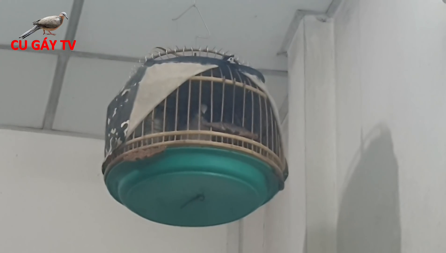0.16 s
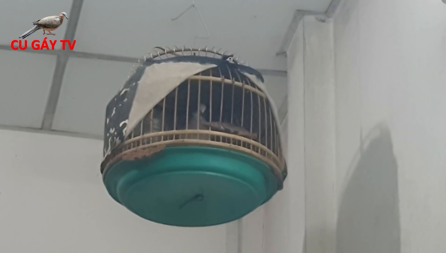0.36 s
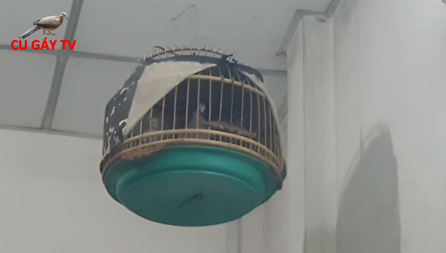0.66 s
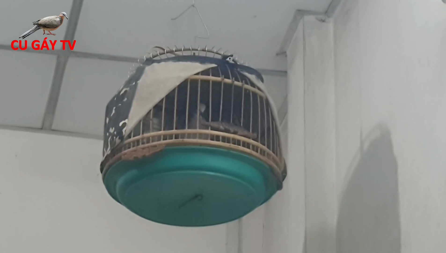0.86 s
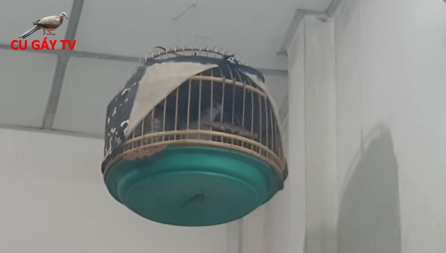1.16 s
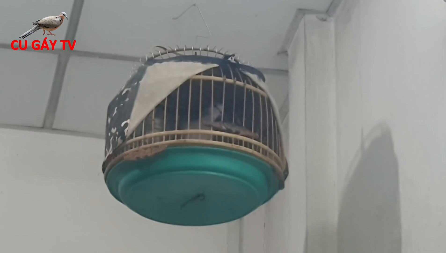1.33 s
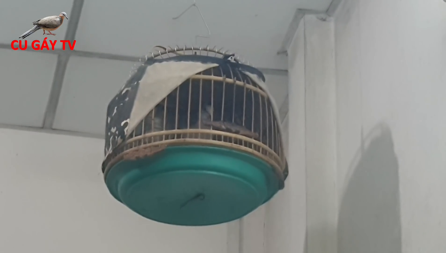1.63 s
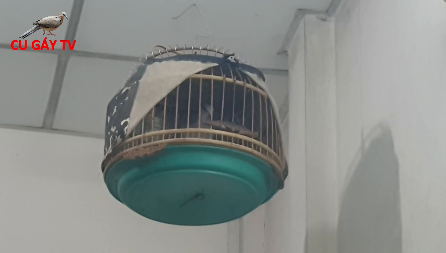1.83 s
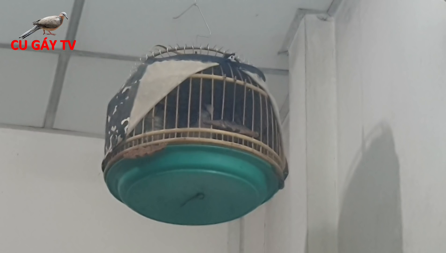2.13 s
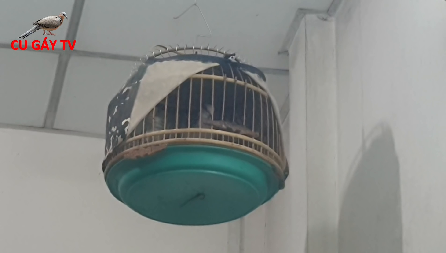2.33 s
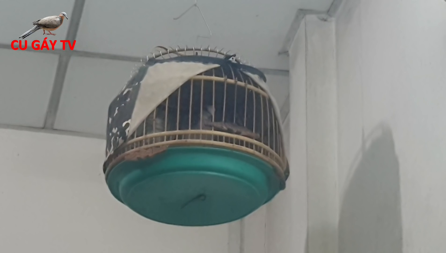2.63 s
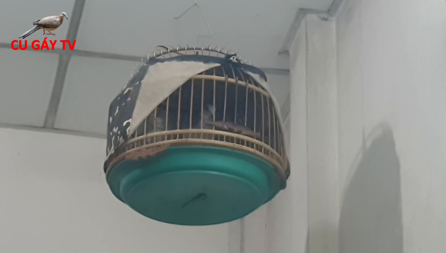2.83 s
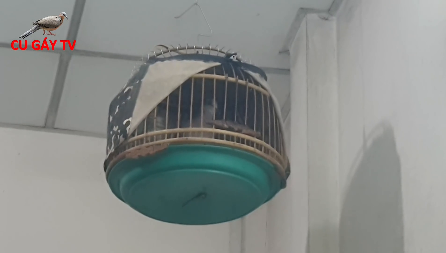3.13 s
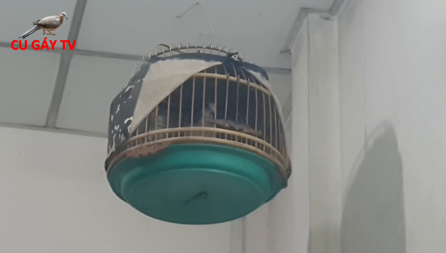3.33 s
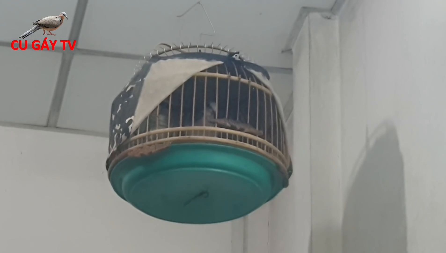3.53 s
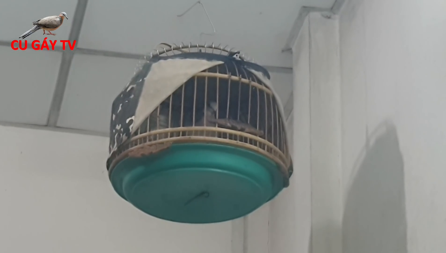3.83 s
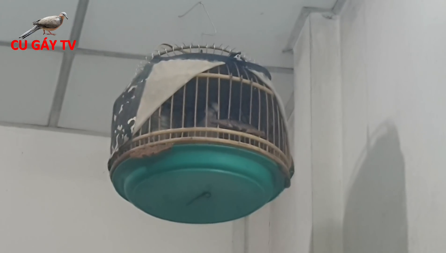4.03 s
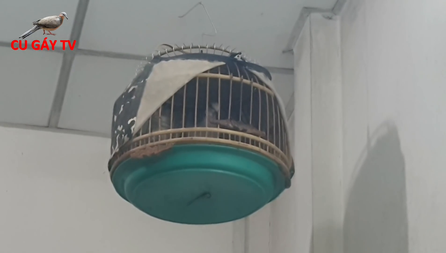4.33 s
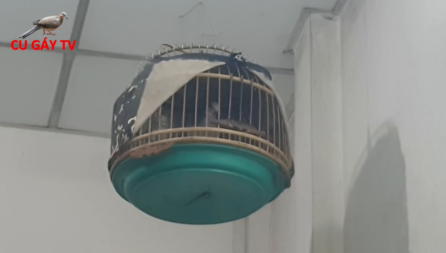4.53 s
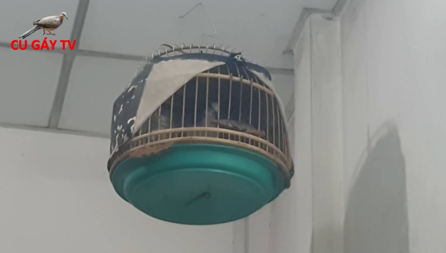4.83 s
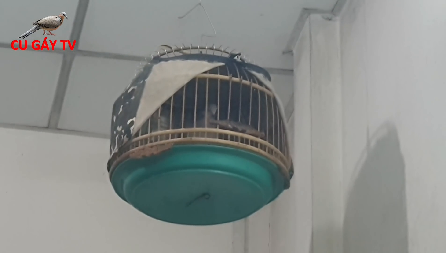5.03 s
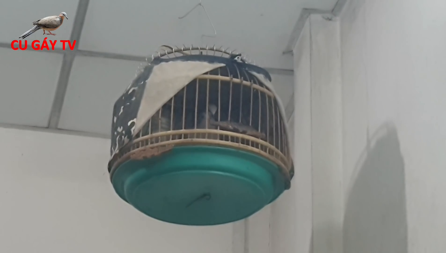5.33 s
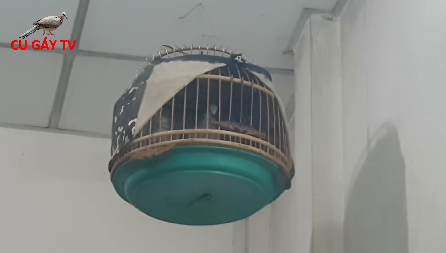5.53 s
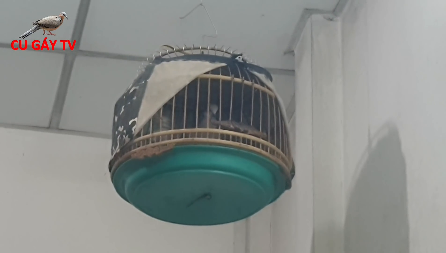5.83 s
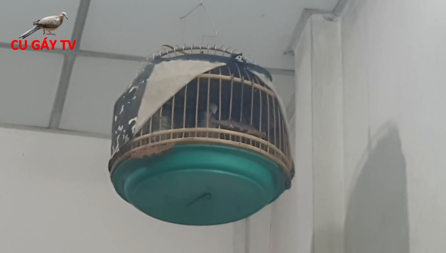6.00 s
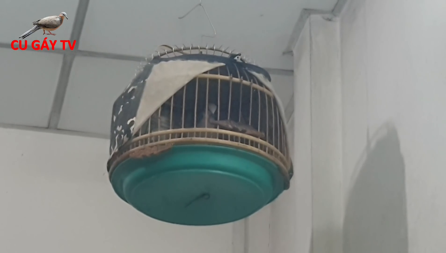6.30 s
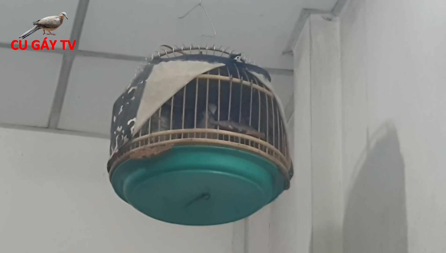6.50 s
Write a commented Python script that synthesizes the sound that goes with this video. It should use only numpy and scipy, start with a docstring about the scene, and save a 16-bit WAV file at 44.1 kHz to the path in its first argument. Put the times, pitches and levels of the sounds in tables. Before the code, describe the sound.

A caged dove coos nearby in a bare, echoing room. It gives four phrases, each one or two short notes followed by a longer, trilled coo that rings off the walls. A farther dove answers softly midway and again over the last coo. Faint feather rustles and thin cheeps of small birds come and go above a steady low room rumble.

```python
"""A spotted dove in a hanging cage starts cooing at once, over the steady low rumble of a bare room.
Each phrase is one or two short arched notes, then a long trilled coo, voiced through its swollen throat.
Feathers rustle and small birds cheep faintly, early on and now and then after. The dove calls again
at 1.5 s, a farther dove answers at 2.7 s, and two more phrases follow at 3.3 s and 5.2 s.
The far dove joins in over the last coo. The hard walls smear every note and ring on after it."""
import sys
import numpy as np
from scipy import signal
from scipy.fft import rfft, irfft, next_fast_len
from scipy.io import wavfile
from scipy.ndimage import uniform_filter1d, map_coordinates

SR = 44100
rng = np.random.default_rng(int(sys.argv[2]) if len(sys.argv) > 2 else 0)


def bounce(signal):
    """Save signal as a 16-bit WAV file at the path given by the first command-line argument."""
    frames = np.transpose(np.atleast_2d(signal))
    limited = np.clip(frames, -1, 1)
    pcm = np.round(limited * 32767).astype(np.int16)
    wavfile.write(sys.argv[1], SR, pcm)


N = 293706
TIME = np.arange(N) / SR

# tone colour of the low rumble: frequency_hz, relative_db
RUMBLE_COLOUR = [(18, -44), (30, -19), (47, -2.5), (62, -6), (82, -12), (99, -7), (130, -8), (175, -1),
                 (245, -2), (330, -6.5), (400, -10.5), (500, -25.5), (700, -56), (1100, -120)]
# tone colour of the soft air noise: frequency_hz, relative_db
AIR_COLOUR = [(240, -28.5), (430, -3.5), (600, -1), (1000, -6.5), (1400, -12), (1850, -13.5), (2400, -18),
              (3100, -26.5), (3900, -30.5), (4800, -28), (7700, -34.5), (8600, -34), (9100, -38.5),
              (11000, -42.5)]
# resonances of a distant motor: pitch_hz, width_hz, level_db
MOTOR_BANDS = [(178.1, 14, -63), (1201, 17, -65)]
# how alike the noise is left and right (1 = the same): frequency_hz, likeness
STEREO_LIKENESS = [(40, .9), (200, 1), (330, 0.95), (600, .4), (1100, 0), (3000, 0), (11000, 0)]
# how much louder the left side is: frequency_hz, left_minus_right_db
STEREO_BALANCE = [(50, 3), (170, 3), (320, -0.9), (700, 1), (1500, 4), (3200, 4.5), (4500, 0.5),
                  (6000, -1.5), (7500, 8), (9000, 7.5), (11000, 3)]
# time the echo takes to fade by 60 dB: frequency_hz, fade_s
ECHO_TIMES = [(200, 1), (700, 0.75), (3500, 0.24), (10000, 0.64)]
# standing waves between the walls: pitch_hz, level_db, left_minus_right_db
ROOM_TONES = [(567, -4.5, 1.5), (530, 2.5, -4.5), (560, -2, -7), (594.3, 5, 4), (651, 1.5, -3.5),
              (684.8, -4.5, -2.5), (689, -3.5, 1), (697, -2, -5), (750, -9.5, -3), (784, -1, 6.5),
              (797, -12.5, 1), (839, -1, 0.5), (857, -4.5, 0.5), (864, 0.5, 4.5)]
# swells of thin, high bird chatter: start_s, length_s, level_db
TWITTER_SWELLS = [(0.32, 0.52, -71), (1.45, 0.72, -72.5), (2.035, 0.57, -69), (3.492, 1, -72.5),
                  (5.445, 0.56, -69.5)]
# tone colour of that chatter: frequency_hz, relative_db
TWITTER_COLOUR = [(3500, -27.5), (4400, -2), (4900, -0.5), (5400, -7.5), (6100, -4), (7200, -18.5)]
# cheeps of small birds: start_s, pitch_hz, length_s, level_db, rasp (0 to 1)
BIRD_CHEEPS = [(.372, 3590, 0.16, -71, 0.85), (2.335, 3580, 0.16, -72, 0.94),
               (2.37, 5830, 0.095, -75, 0.55), (2.908, 3990, 0.14, -74.5, 0.8),
               (2.93, 5900, 0.039, -79, .6), (3.80, 5950, 0.19, -80, 0.9), (4.19, 3490, 0.13, -74, 1),
               (5.52, 4320, 0.09, -75, .7), (5.68, 6050, .2, -79, 0.6), (5.85, 4540, 0.053, -73, 0.8),
               (5.89, 5470, 0.053, -78, .5), (6.285, 3650, 0.17, -74, 0.24)]
# feather strokes: start_s, level_db, fade_s (time to fall 20 dB)
FEATHER_STROKES = [(0.108, -57.5, 0.082), (0.293, -61, 0.069), (0.364, -56.5, 0.067), (0.524, -62, 0.065),
                   (0.716, -52.5, 0.071), (0.83, -61, 0.069), (1.61, -61.5, 0.06), (2.314, -56.5, 0.067),
                   (2.58, -61, 0.063), (4.176, -60, 0.086), (5.252, -61, 0.08), (5.42, -55.5, 0.1),
                   (6.063, -62, 0.096), (6.3827, -64.5, 0.18), (6.515, -64, 0.08)]
# tone colour of a feather stroke: frequency_hz, relative_db
FEATHER_COLOUR = [(1500, -16), (2700, 3.5), (3600, -3.5), (5000, 2.5), (7500, -4.5), (10500, -4),
                  (12000, -21)]
# hoarse noise around a dove's tone: frequency_hz, relative_db
HOARSE_COLOUR = [(300, -27), (430, -8), (530, -3), (700, -1.5), (850, -4.5), (1000, -9.5), (1200, -26.5),
                 (2000, -26), (2800, -34), (4000, -51.5)]
# short arched notes that open each phrase: start_s, length_s, top_pitch_hz, level_db
OPENING_NOTES = [(-.01, 0.18, 713.2, -38.5), (1.529, 0.093, 718.6, -35), (1.703, 0.18, 712.3, -37),
                 (3.277, 0.081, 683, -34.5), (3.471, .14, 693, -35), (5.159, 0.086, 794.5, -31.5),
                 (5.324, 0.16, 691, -34.5)]
# the near dove's long coos:
# start_s, length_s, top_pitch_hz, level_db, crest_after_s, sink_hz_per_s, push_after_s, push_db
NEAR_COOS = [(0.323, 0.39, 823, -26.5, 0.082, 487.7, 0.301, 5.5),
             (2.037, 0.39, 829.3, -25.5, 0.098, 530.4, 0.2, 1.5),
             (3.778, .397, 835.4, -25, .105, 579.7, .207, 5),
             (5.651, 0.39, 825, -24.5, .11, 535.6, 0.23, 5)]
# the farther dove's coos, with the same columns
ANSWER_COOS = [(2.73, 0.44, 893, -52.5, .23, 842, 0.4, 7), (5.94, .55, 768, -40, .11, 501.6, 0.44, 9.8)]


def amp(db):
    """Turn decibels into a number to multiply by."""
    return 10 ** (np.asarray(db) / 20)


def unit(x):
    """Scale a sound to an average strength (rms) of 1."""
    return x / np.sqrt(np.mean(x ** 2) + 1e-20)


def look_up(points, hz):
    """Read between the rows of a (frequency_hz, value) table, on a log frequency scale."""
    frequencies, values = np.transpose(points)
    return np.interp(np.log(hz + 1), np.log(frequencies + 1), values)


def wobble(rate):
    """A smooth curve through `rate` random values a second."""
    return map_coordinates(rng.standard_normal(int(N * rate / SR) + 4), [TIME * rate])


def phase(hz):
    """The angle a wave has turned through as its pitch moves."""
    return 2 * np.pi * np.cumsum(hz) / SR


def gate(age, length, edge_s):
    """Fade a note in and out at its edges."""
    return np.clip(np.minimum(age, length - age) / edge_s, 0, 1)


def filtered(x, response):
    """Shape a sound: response(f) scales and delays each frequency."""
    size = next_fast_len(N + SR)
    return irfft(rfft(x, size) * response(np.fft.rfftfreq(size, 1 / SR)), size)[..., :N]


def resonance(f, hz, width):
    """Response of something that rings at one pitch, 1 at its centre."""
    return 1j * f * width / (hz * hz - f * f + 1j * f * width)


def placed(pair):
    """Give left and right a different tone colour."""
    return filtered(pair, lambda f: amp(np.outer([.5, -.5], look_up(STEREO_BALANCE, f))))


def stereo_noise(colour):
    """Noise whose two sides are alike in the bass and unrelated in the treble."""
    def response(f):
        angle = np.arccos(np.clip(look_up(STEREO_LIKENESS, f), -1, 1)) / 2
        return amp(look_up(colour, f)) * [np.ones_like(f), np.tan(angle)]
    shared, opposed = filtered(rng.standard_normal((2, N)), response)
    return np.array([shared + opposed, shared - opposed]) / np.std(shared)


def background(rumble_db=-50, air_db=-55):
    """Low rumble, soft air noise and a distant motor's hum."""
    rumble = amp(rumble_db + 0.47 * wobble(5)) * stereo_noise(RUMBLE_COLOUR)
    air = amp(air_db + 0.13 * wobble(4.2)) * stereo_noise(AIR_COLOUR)
    hum = 0
    for hz, width, db in MOTOR_BANDS:
        noise = stereo_noise([(100, 0), (2000, 0.0034)])
        hum += amp(db) * unit(filtered(noise, lambda f: resonance(f, hz, width) ** 2))
    return placed(rumble + air + hum)


def room(x, direct_db, echo_db, width_db=0):
    """The direct sound plus a smeared echo, partly shared by left and right and partly opposed."""
    hz, t, noise = signal.stft(rng.standard_normal((2, SR)), SR, nperseg=256)
    fade = amp(-60 * t / look_up(ECHO_TIMES, hz)[:, None])
    spectrum = rfft(signal.istft(noise * fade, SR, nperseg=256)[1])
    # the walls return the same energy in every band
    energy = np.abs(uniform_filter1d(np.abs(spectrum) ** 2, size=40))
    tail = irfft(spectrum / np.sqrt(energy + 1e-12))[:, :SR // 2]
    shared, opposed = signal.fftconvolve(x[None], tail, axes=1)[:, :N] / np.sqrt(2)
    return amp(direct_db) * x + amp(echo_db) * (shared + np.outer([1, -1], amp(width_db) * opposed))


def standing_waves(f, width_hz=5.1):
    """The room's ringing tones; close ones beat, so a note swells again after it ends."""
    sides = np.array([[.5], [-.5]])
    return sum(amp(db + lean * sides) * resonance(f, hz, width_hz) for hz, db, lean in ROOM_TONES)


def twitter():
    """Far-off chatter blurs into soft, high swells."""
    swells = np.zeros(N)
    for start, length, db in TWITTER_SWELLS:
        progress = np.clip((TIME - start) / length, 0, 1)
        swells += amp(db) * np.sqrt(np.abs(np.sin(np.pi * progress)))
    chatter = unit(amp(1.6 * wobble(25)) * stereo_noise(TWITTER_COLOUR))
    return placed(swells * chatter) * amp(-2.5)


def small_birds(drop=.008, snap=0.33, settle_s=.003, rasp_depth=0.032, fade_db=12):
    """Each cheep snaps down to a raspy, nearly level pitch and fades."""
    cheeps = np.zeros(N)
    waver = rasp_depth * wobble(300)
    for start, hz, length, db, rasp in BIRD_CHEEPS:
        age = np.clip(TIME - start, 0, length)
        past_middle = age / length - .5
        pitch = hz * (1 + rasp * waver + snap * np.exp(-age / settle_s) - drop * past_middle)
        cheeps += amp(db - fade_db * past_middle) * gate(age, length, .004) * np.sin(phase(pitch))
    return placed(room(cheeps, direct_db=-7, echo_db=3))


def feathers(rise_s=0.011):
    """Feathers brush the cage bars in brief, grainy strokes."""
    strokes = np.zeros(N)
    for start, db, fade_s in FEATHER_STROKES:
        age = np.maximum(TIME - start, 0)
        strokes += amp(db) * (1 - np.exp(-age / rise_s)) * amp(-20 * age / fade_s)
    grains = rng.standard_normal(N) * amp(4.5 * wobble(400))
    rustle = unit(filtered(grains, lambda f: amp(look_up(FEATHER_COLOUR, f))))
    return placed(room(strokes * rustle, direct_db=-8, echo_db=0.5))


def throat(tone, octave_db=-48, cutoff_hz=870, hoarse_db=-19):
    """The swollen throat pouch passes the main tone, a little hoarseness and a trace of the octave."""
    wave = signal.hilbert(tone, next_fast_len(N))[:N]  # its size follows the tone's loudness
    octave = np.real(wave * wave) / (np.abs(wave) + 1e-9)
    breath = unit(filtered(rng.standard_normal(N), lambda f: amp(look_up(HOARSE_COLOUR, f))))
    hoarseness = np.abs(wave) / np.sqrt(2) * breath
    main_tone = filtered(tone, lambda f: 1 / np.sqrt(1 + (f / cutoff_hz) ** 18))
    return main_tone + amp(octave_db) * octave + amp(hoarse_db) * hoarseness


def coo_shape(age, length, crest_s, sink_hz_per_s, push_s, push_db):
    """A coo climbs to a crest, sinks as the air runs down, is pushed once more, then gives way."""
    rise_hz_per_s, fade_db_per_s = 260, 37.5
    collapse_s, collapse_hz = 0.0553, 119.3
    light_trill, full_trill, build_s = 0.36, 0.921, 0.1436
    before_crest, after_crest = np.maximum(crest_s - age, 0), np.maximum(age - crest_s, 0)
    collapse = np.maximum(1 - (length - age) / collapse_s, 0)
    swell_db = push_db * np.exp(-.5 * ((age - push_s) / 0.025) ** 2)
    build = np.minimum(age / build_s, 1) ** 2 * (1 - collapse)
    trill = light_trill + (full_trill - light_trill) * build
    trill *= 1 - 0.1 * swell_db  # the brief push smooths the trill
    bend_hz = -rise_hz_per_s * before_crest - sink_hz_per_s * after_crest - collapse_hz * collapse
    return bend_hz, swell_db - fade_db_per_s * after_crest, np.clip(trill, 0, 1)


def long_coos(coos, trill_hz, sag):
    """A fast, uneven trill chops each coo, and the pitch sags in every brief closure."""
    tone = np.zeros(N)
    trill_rate = trill_hz * (1 + 0.189 * wobble(55))
    closure = ((1 + np.cos(phase(trill_rate))) / 2) ** 2
    waver, flutter = 1 + 0.01105 * wobble(120), amp(2.46 * wobble(80))
    for start, length, hz, db, *shape in coos:
        age = np.clip(TIME - start, 0, length)
        bend_hz, swell_db, trill = coo_shape(age, length, *shape)
        pitch = (hz + bend_hz) * waver * (1 - sag * trill * (closure - .2))
        chop = (1 - trill * closure) / (1 - 0.31 * trill)  # dividing keeps the loudness about even
        tone += amp(db + swell_db) * gate(age, length, 0.0044) * chop * np.sin(phase(pitch))
    return np.sqrt(2) * tone * flutter


def far_dove():
    """The answering dove is heard mostly by way of the walls."""
    tone = long_coos(ANSWER_COOS, trill_hz=60.7, sag=.2)
    voice = throat(tone, octave_db=-55, cutoff_hz=905, hoarse_db=-20.5)
    return room(voice, direct_db=-5.5, echo_db=4.5, width_db=-2)


def short_notes(low_hz=510, swell_db=10, rising_share=0.595):
    """Pitch and loudness rise and fall together with the air pressure of each short note."""
    tone = np.zeros(N)
    waver = 1 + 0.0255 * wobble(180)
    lead_s, lead_hz, lead_db = 0.0352, 688, -9.5  # a quick, softer note leads into each near coo
    lead_ins = [(start - lead_s, lead_s, lead_hz, db + lead_db) for start, _, _, db, *_ in NEAR_COOS]
    for start, length, hz, db in OPENING_NOTES + lead_ins:
        age = TIME - start
        pressure = np.sin(np.pi * np.interp(age / length, [0, rising_share, 1], [0, .5, 1]))
        pitch = (low_hz + (hz - low_hz) * pressure) * waver
        tone += amp(db + swell_db * (pressure - 0.5)) * gate(age, length, 0.0036) * np.sin(phase(pitch))
    return np.sqrt(2) * tone


def caged_dove(ring_db=-1):
    """The near dove, a little to the left; its notes set the room ringing."""
    voice = throat(short_notes() + long_coos(NEAR_COOS, trill_hz=76, sag=.17))
    in_room = room(voice, direct_db=-8, echo_db=-2, width_db=-1.5) * amp([[1], [-1]])
    return in_room + amp(ring_db) * filtered(voice, standing_waves)


def scene():
    """All the sounds in the room, added together."""
    return caged_dove() + far_dove() + small_birds() + twitter() + feathers() + background()


def record(dry, top_hz=11400):
    """Cut away the highest treble."""
    return filtered(dry, lambda f: 1 / np.sqrt(1 + (f / top_hz) ** 100))


dry = scene()
out = record(dry)
bounce(out)
```